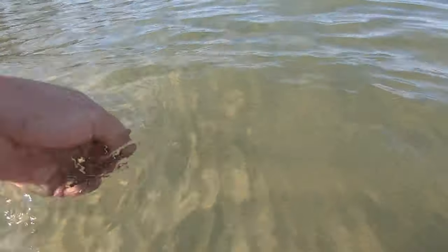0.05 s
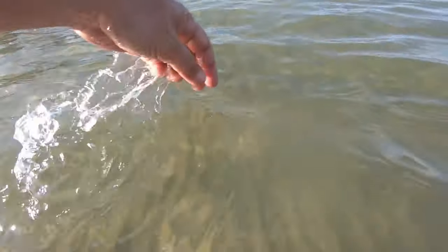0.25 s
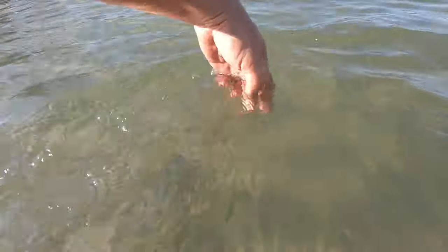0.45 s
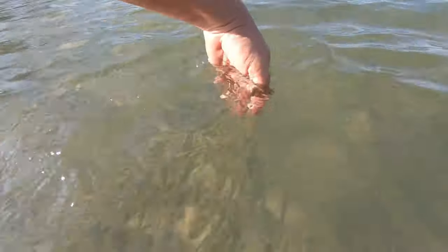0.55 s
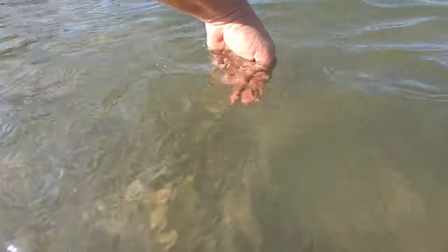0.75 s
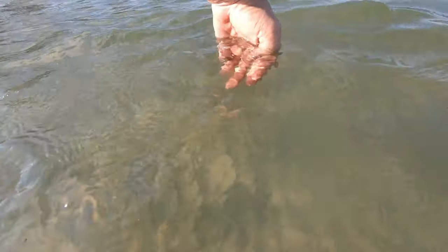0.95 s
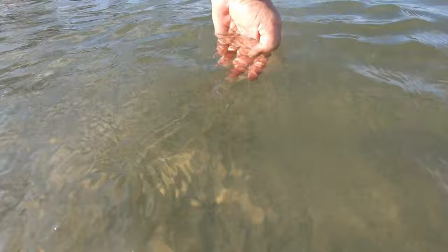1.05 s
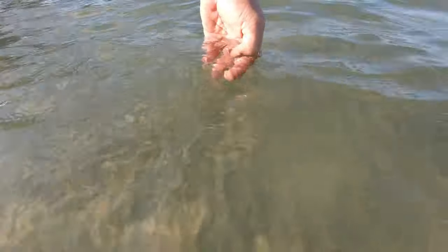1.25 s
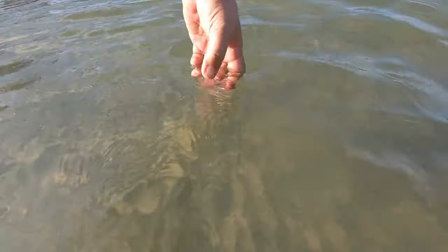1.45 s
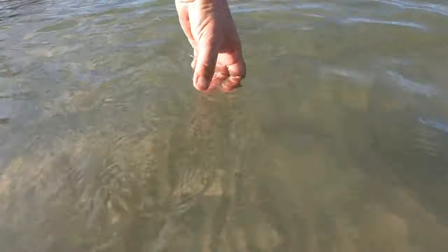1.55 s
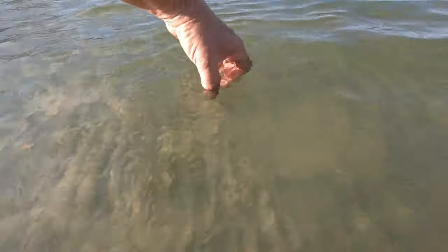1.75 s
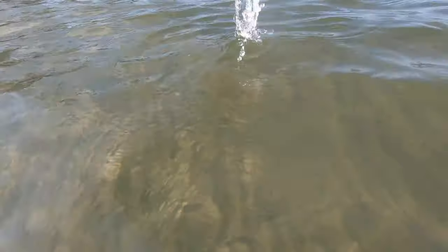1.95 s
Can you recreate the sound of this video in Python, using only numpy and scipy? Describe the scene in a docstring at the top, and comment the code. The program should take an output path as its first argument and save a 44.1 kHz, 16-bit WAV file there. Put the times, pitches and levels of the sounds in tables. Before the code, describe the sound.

A short splash lands as a few quick slaps and drips when a hand tosses water in the sea shallows. Faint lapping follows over a steady wash and low drone, with light wind buffeting the dull-sounding microphone.

```python
"""Small waves wash throughout over a low drone; a breeze rumbles on the right microphone port.
A hand flicks shallow sea water. From 0.44 s the thrown water falls back in four quick slaps,
each a ringing air pocket, with bubbles, spray and a patter of drops. The slosh dies away,
a few faint slaps follow, and the breeze buffets the port at 1.6 and 1.8 s.
The microphone is muffled: the spectra and pitches below favour 1.8 kHz and hold little treble."""
import sys
import numpy as np
from scipy import signal
from scipy.fft import rfft, irfft
from scipy.io import wavfile
from scipy.ndimage import uniform_filter1d

SR = 44100
rng = np.random.default_rng(int(sys.argv[2]) if len(sys.argv) > 2 else 0)


def wrap_up_sound(samples):
    """Save the sound to the file named by the first command line argument, as 16-bit audio."""
    columns = np.atleast_2d(samples).T
    # keep every value between -1 and 1, then stretch to whole-number steps
    tamed = np.clip(columns, -1, 1)
    steps = np.round(tamed * 32767).astype(np.int16)
    wavfile.write(sys.argv[1], SR, steps)


N = 88200

# Lumps of water landing. Each row: start in seconds, length in seconds, ring in Hz, level in dB,
# peak position 0-1, roughness 0-1, left over right in dB, left lead in radians.
SLAP_EVENTS = [(.4417, 0.0069, 1914, -21, 0.4, 0.22, 10.5, 1.1),
               (.4532, .0064, 1912, -16.5, 0.7, 0.11, 8, 2), (.4757, 0.0043, 2090, -17.5, 0.5, 0.1, 8, 2.8),
               (.4786, 0.0044, 1650, -20, 0.5, 0.17, 7.5, 1), (.4936, .0064, 1762, -12, 0, 0.1, 6.5, 1.36),
               (0.505, 0.008, 1705, -27, 0.7, .15, 2.5, 1.5),
               (0.552, 0.0033, 1600, -32.5, 0.6, 0.16, 4, 1.1),
               (.578, 0.0073, 1876, -28.5, .5, 0.04, 1, 1.2),
               (0.939, 0.008, 1590, -29.5, 0.8, 0.1, 11.5, 2.3),
               (0.947, 0.0052, 1754, -29.5, 0.7, 0.09, 13.5, .5),
               (1.228, 0.0054, 1720, -29, 0.5, 0, 4, 1.86), (1.628, 0.0034, 1420, -37, 0.6, 0.06, -8, 0.57)]
# Spray in a slap. Each row: frequency in Hz, relative density in dB.
SPRAY_SPECTRUM = [(250, -24.5), (700, -34), (1000, -4.5), (1700, 4.5), (2200, 10), (2600, -4),
                  (3300, -26.5), (4500, -31.5), (7000, -49), (10000, -61.5), (14000, -72)]
# Bubbles. Each row: start in seconds, pitch in Hz, level in dB, T60 in seconds, left over right in dB.
BUBBLE_EVENTS = [(.058, 1985, -33, .05, 2), (.317, 3100, -40.5, 0.017, 0), (.326, 3280, -46.5, 0.039, 0),
                 (.343, 3620, -38.5, 0.016, -1), (.348, 5370, -57, 0.017, -2.5), (.368, 4780, -56, .04, 1),
                 (.387, 1636, -23.5, 0.039, -1), (0.402, 1113, -24.5, 0.083, 4),
                 (0.4013, 1967, -25, 0.038, 9.5), (.441, 2820, -22, 0.0078, -2.5),
                 (0.4427, 940, -26, 0.033, 5.5), (0.4513, 3170, -27.5, .011, -1.5),
                 (0.457, 1227, -26.5, 0.048, 6), (.477, 950, -29.5, .018, 4), (0.4804, 1522, -21, 0.033, 7),
                 (0.4919, 4240, -41, .014, -1.5), (0.4916, 2425, -17, 0.019, 2),
                 (.4945, 3110, -24.5, .009, -2.5), (.53, 2850, -29, 0.0095, 2), (.572, 3100, -46, .014, 3),
                 (.59, 2550, -25, .016, -1), (.607, 2780, -32, 0.013, 1), (.879, 292.4, -36, 0.15, -1),
                 (1.139, 1850, -37, 0.056, 7), (1.984, 2660, -37, 0.017, 5)]
# Falling drops. Each row: time in seconds, drops per second, base level in dB.
PATTER_CURVE = [(0, 250, -41), (.28, 180, -52.5), (.41, 200, -40), (.48, 340, -26), (.62, 360, -33.5),
                (1, 230, -35), (1.6, 76, -40), (2, 120, -44)]
# Fine spray. Each row: time in seconds, level in dB.
CRACKLE_CURVE = [(.28, -88), (.35, -61.5), (.43, -69.5), (.445, -61), (.498, -51.5), (.508, -72),
                 (.59, -62.5), (.635, -78), (.69, -64), (.8, -81)]
# Single drops striking. Each row: time in seconds, level before filtering in dB.
TICK_EVENTS = [(.348, -35), (.402, -29), (0.4417, -24), (.453, -22), (.4865, -20.5), (0.4939, -15),
               (.533, -28.5), (.574, -32.5), (.591, -27.5), (.609, -31.5)]
# Colour of fine spray and ticks. Each row: frequency in Hz, gain in dB.
CRACKLE_SPECTRUM = [(1500, -21), (3000, 6), (4500, -8.5), (7000, -23), (10000, -43), (14000, -49.5)]
# Stirred water, waves, breeze, drone. Each row: frequency in Hz, relative density in dB.
SLOSH_SPECTRUM = [(120, -24), (220, -3), (300, -3), (450, -4), (700, -12), (1100, -26), (3000, -69.5)]
WASH_SPECTRUM = [(100, -26), (280, -16), (400, -17.5), (700, -9), (1000, -11), (1250, -7.5), (1600, -6),
                 (1950, -2.5), (2300, -12), (2700, -20), (3200, -29), (4000, -38.5), (5000, -46),
                 (7000, -53), (10000, -62.5), (11500, -84), (15000, -79.5)]
WIND_SPECTRUM = [(8, -2.5), (22, 3), (50, -3.5), (80, -7.5), (130, -18.5), (250, -30.5), (600, -50),
                 (1500, -89.5)]
DRONE_SPECTRUM = [(20, -9), (60, -5.5), (100, -21), (125, -3.5), (145, .5), (170, -10), (220, -13.5),
                  (280, -35), (900, -79.5)]
# Strength of slosh and breeze. Each row: time in seconds, level in dB.
SLOSH_CURVE = [(0, -59.5), (.2, -51.5), (.45, -48), (.65, -50), (.85, -51), (1.05, -56), (1.4, -58),
               (1.64, -61.5), (1.77, -76), (1.86, -58.5), (2, -58)]
WIND_CURVE = [(0, -46.5), (.09, -50), (.15, -38.5), (.31, -42.5), (.45, -41.5), (.7, -39.5), (.87, -36.5),
              (1.03, -41.5), (1.22, -34.5), (1.36, -42.5), (1.55, -40.5), (1.72, -39), (1.78, -47),
              (1.85, -43), (2, -41.5)]
# Swell of the waves. Each row: time in seconds, level in dB, treble shelf in dB, low shelf in dB.
WASH_CURVE = [(0, -39.5, 2.5, 3.5), (.2, -39.5, 0.5, -4.5), (.38, -36, 0, 0), (.47, -34.5, 2, -9.5),
              (.55, -35, -3.5, -2), (.68, -35.5, 0, -3), (.84, -39, -2.5, 0.5), (.95, -38.5, 0, 2),
              (1.12, -42.5, 1, 3), (1.32, -42.5, 2, 3), (1.5, -42.5, -1, -2), (1.69, -46.5, 2, 9.5),
              (1.78, -45, 2.5, 0.5), (1.96, -41.5, 4, -0.5), (2, -40.5, 9.5, 1)]
# Hollow note of the lapping. Each row: time in seconds, centre in Hz.
HOLLOW_CURVE = [(0, 1600), (.55, 1860), (1, 1737), (1.45, 1536), (1.75, 1505), (1.9, 1750), (2, 1800)]
# Wind buffets. Each row: start in seconds, length in seconds, first and last pitch in Hz, level in dB.
BUFFET_EVENTS = [(1.623, 0.035, 298, 37.5, -26.5), (1.803, 0.076, 68.5, 40, -30)]
# Microphone ports. Each row: frequency in Hz, coherence 0-1, left lead in radians, left over right in dB.
PORT_RESPONSE = [(250, 0.7, 0.2, -0.5), (450, .8, .5, -0.5), (730, .6, 1, 5), (960, 0.5, 0, 6),
                 (1200, 0.5, 0, 5), (1490, 0.9, 1.17, 8), (1765, 0.7, 2, 5.5), (1980, 0.4, 4.5, 3),
                 (2380, 0.4, 5, 3.5), (2880, 0.1, 5.5, 4), (3780, 0.6, 7, 0), (9000, .3, 8, -1.5)]


def slaps(edge_s=.0011, droop_db=8.5, rise=0.1):
    """Each lump of water rings for milliseconds, mixed with spray; pitch climbs as its air pocket closes."""
    out, spray = np.zeros((2, N)), signal.hilbert(noise(SPRAY_SPECTRUM))
    for start_s, length_s, hz, db, peak, rough, pan_db, lead_rad in SLAP_EVENTS:
        t = np.arange(0, length_s, 1 / SR)
        opening = np.sin(np.pi / 2 * np.minimum(t / edge_s, 1))
        closing = np.sin(np.pi / 2 * np.minimum((length_s - t) / edge_s, 1))
        envelope = (opening * closing) ** 2 * amp(db - droop_db * abs(t / length_s - peak))
        cycles = hz * t * (1 + rise * (t / length_s - 1) / 2)
        ring = np.sqrt(1 - rough) * np.exp(2j * np.pi * cycles)
        hiss = np.sqrt(rough) * unit_rms(spray[round(start_s * SR):][:len(t)])
        add(out, start_s, ports(envelope * (ring + hiss), pan_db, lead_rad))
    return out


def bubble(hz, t60_s, rise_per_t60=0.071, attack_s=0.0007):
    """Damped complex ring; pitch climbs as the bubble nears the surface."""
    t = np.arange(0, 1.5 * t60_s, 1 / SR)
    cycles = hz * (t + rise_per_t60 * t ** 2 / (2 * t60_s))
    attack = 1 - np.exp(-(t / attack_s) ** 2)
    return attack * np.exp(-np.log(1000) * t / t60_s + 2j * np.pi * cycles)


def bubbles():
    """The clearest bubbles and drips, one ring each."""
    out = np.zeros((2, N))
    for start_s, hz, db, t60_s, pan_db in BUBBLE_EVENTS:
        _, lead_rad, _ = at_hz(PORT_RESPONSE, hz)
        add(out, start_s, ports(amp(db) * bubble(hz, t60_s), pan_db, lead_rad))
    return out


def patter(candidates=1600, low_hz=1350, high_hz=4500, decay_cycles=3.5, spread_db=6):
    """Small ringing drops, thickest as the splash lands, coloured like the wash."""
    out = np.zeros((2, N))
    for when, chance, pitch, size, side, phase in rng.random((candidates, 6)):
        start_s = when * N / SR
        drops_per_s, base_db = at_time(PATTER_CURVE, start_s)
        if chance < drops_per_s * N / SR / candidates:
            hz = low_hz * (high_hz / low_hz) ** pitch
            db = base_db + at_hz(WASH_SPECTRUM, hz)[0] + spread_db * min(-np.log(1 - size), 2)
            ring = amp(db) * bubble(hz, np.log(1000) * decay_cycles / hz)
            _, lead_rad, pan_db = at_hz(PORT_RESPONSE, hz)
            add(out, start_s, ports(ring, pan_db + 8 * (side - .5), lead_rad + 2 * (phase - .5)))
    return out


def crackle(hits_per_s=500, stereo_scatter=0.5, left_db=-1.5):
    """Fine spray and a few sharper drops strike as filtered impulses."""
    hits = rng.random(N) < hits_per_s / SR
    sizes = rng.standard_normal(N) + stereo_scatter * rng.standard_normal((2, N))
    spray = unit_rms(filtered(hits * sizes, CRACKLE_SPECTRUM)) * level(CRACKLE_CURVE)
    ticks = np.zeros((2, N))
    for start_s, db in TICK_EVENTS:
        add(ticks, start_s, np.full((2, 1), amp(db)))
    return (spray + filtered(ticks, CRACKLE_SPECTRUM)) * amp([[left_db], [0]])


def slosh():
    """Dull churn of stirred water, dying away after the flick; mono."""
    return level(SLOSH_CURVE) * noise(SLOSH_SPECTRUM)


def wash(patchy_db=1.44, flicker_db=0.32, hollow_db=4, hollow_width_hz=192, treble_hz=2440, low_hz=950):
    """Lapping waves: patchy noise with a hollow note, swelling with the splash, then settling."""
    hz = np.fft.rfftfreq(512, 1 / SR)
    t = np.arange(N // 128 + 5)[:, None] * 128 / SR
    left_re, left_im, other_re, other_im, patches = rng.standard_normal((5, len(t), len(hz)))
    patches = unit_rms(uniform_filter1d(uniform_filter1d(patches, size=8, axis=0), size=6, axis=1))
    flicker = unit_rms(uniform_filter1d(rng.standard_normal(len(t)), size=6))[:, None]
    coherence, lead_rad, pan_db = at_hz(PORT_RESPONSE, hz)
    left, other = left_re + 1j * left_im, other_re + 1j * other_im
    right = (coherence * left + np.sqrt(1 - coherence ** 2) * other) * np.exp(-1j * lead_rad)
    _, treble_db, low_db = at_time(WASH_CURVE, t)
    hollow = np.exp(-((hz - at_time(HOLLOW_CURVE, t)[0]) / hollow_width_hz) ** 2)
    colour_db = at_hz(WASH_SPECTRUM, hz)[0] + hollow_db * hollow
    colour_db += patchy_db * patches + flicker_db * flicker
    colour_db += treble_db * hz ** 8 / (hz ** 8 + treble_hz ** 8) + low_db / (1 + (hz / low_hz) ** 4)
    frames = np.array([left * amp(pan_db / 2), right * amp(-pan_db / 2)]) * amp(colour_db)
    _, waves = signal.istft(frames, nperseg=512, noverlap=384, time_axis=1, freq_axis=2)
    return unit_rms(waves[:, :N]) * level(WASH_CURVE)


def wind(left_db=-27):
    """Breeze on the right port: lumpy rumble and two buffets of falling pitch."""
    out = level(WIND_CURVE) * np.array([noise(WIND_SPECTRUM), noise(WIND_SPECTRUM)])
    for start_s, length_s, first_hz, last_hz, db in BUFFET_EVENTS:
        progress = np.arange(0, length_s, 1 / SR) / length_s
        hz = first_hz * (last_hz / first_hz) ** progress
        push = amp(db) * np.sin(np.pi * progress) * np.sin(2 * np.pi * np.cumsum(hz) / SR)
        add(out, start_s, np.array([push, push]))
    return out * amp([[left_db], [0]])


def drone(level_db=-47):
    """Steady low noise; mono."""
    return amp(level_db) * noise(DRONE_SPECTRUM)


def ports(sound, pan_db, lead_rad):
    """Complex sound as heard at the left and right ports."""
    return np.array([sound * amp(pan_db / 2), sound * amp(-pan_db / 2) * np.exp(-1j * lead_rad)]).real


def amp(db):
    return 10 ** (np.asarray(db) / 20)


def unit_rms(x):
    return x / np.sqrt(np.mean(abs(x) ** 2) + 1e-20)


def at_hz(table, hz):
    """Value columns, interpolated over log frequency."""
    knots_hz, *columns = np.transpose(table)
    return [np.interp(np.log(hz + 1), np.log(knots_hz + 1), column) for column in columns]


def at_time(table, t):
    """Value columns, interpolated over time."""
    knots_s, *columns = np.transpose(table)
    return [np.interp(t, knots_s, column) for column in columns]


def level(curve):
    """Curve in dB to gain per sample."""
    return amp(at_time(curve, np.arange(N) / SR)[0])


def filtered(x, spectrum):
    gain_db = at_hz(spectrum, np.fft.rfftfreq(N, 1 / SR))[0]
    return irfft(rfft(x) * amp(gain_db), N)


def noise(spectrum):
    return unit_rms(filtered(rng.standard_normal(N), spectrum))


def add(mix, start_s, sound):
    part = mix[:, round(start_s * SR):][:, :sound.shape[1]]
    part += sound[:, :part.shape[1]]


def scene():
    """Splash, sea, breeze and drone in stereo."""
    return slaps() + bubbles() + patter() + crackle() + slosh() + wash() + wind() + drone()


def record(dry, fade_in_s=.004, cutoff_hz=14000):
    """Soft start and the recorder's band limit."""
    fade = np.minimum(np.arange(N) / SR / fade_in_s, 1)
    lowpass = signal.firwin(255, cutoff_hz, window=("kaiser", 9), fs=SR)
    return signal.oaconvolve(dry * fade, lowpass[None], "same")


dry = scene()
out = record(dry)
wrap_up_sound(out)
```